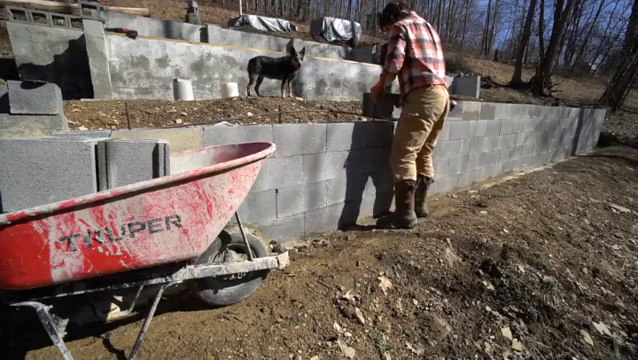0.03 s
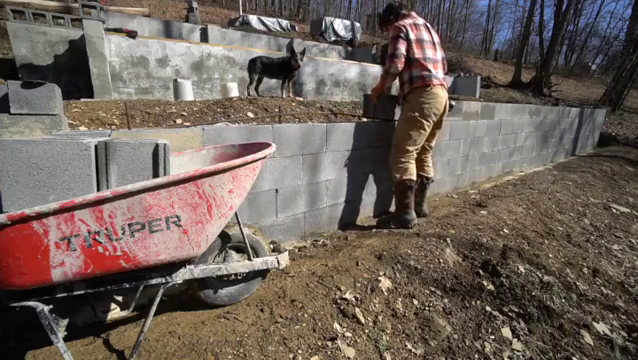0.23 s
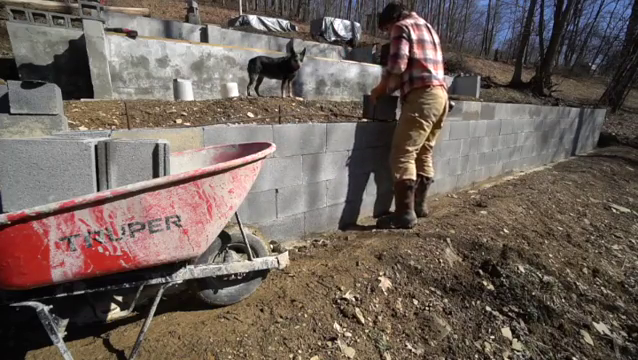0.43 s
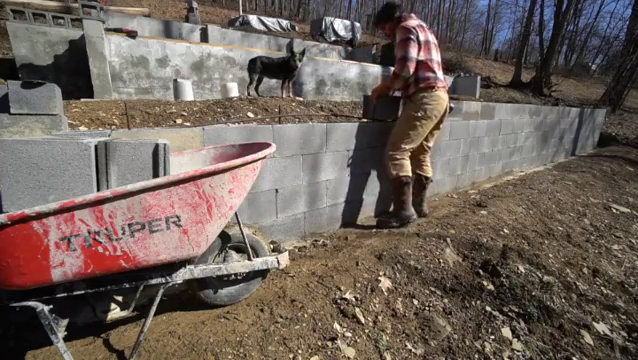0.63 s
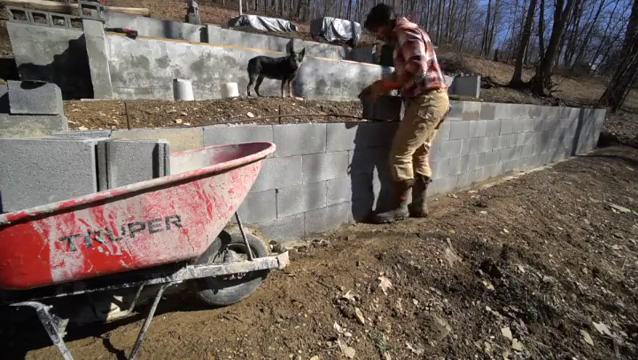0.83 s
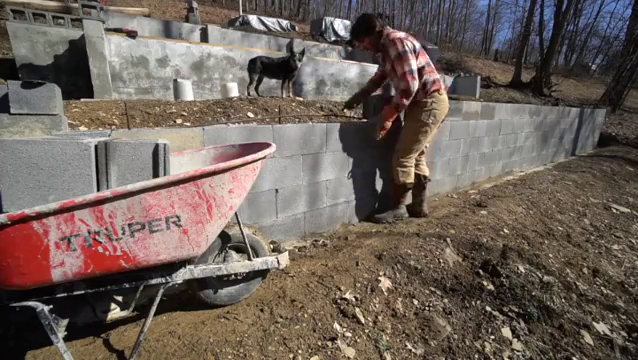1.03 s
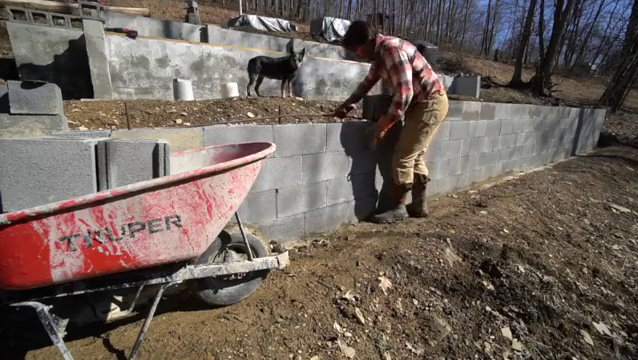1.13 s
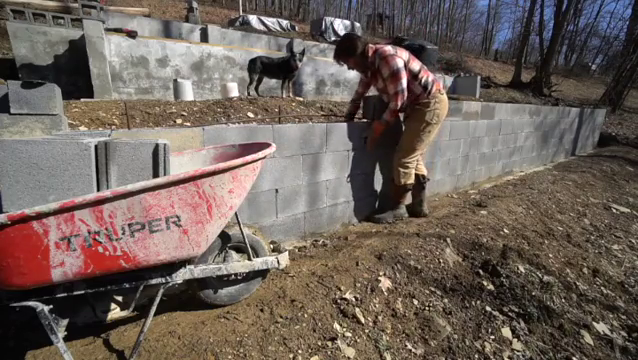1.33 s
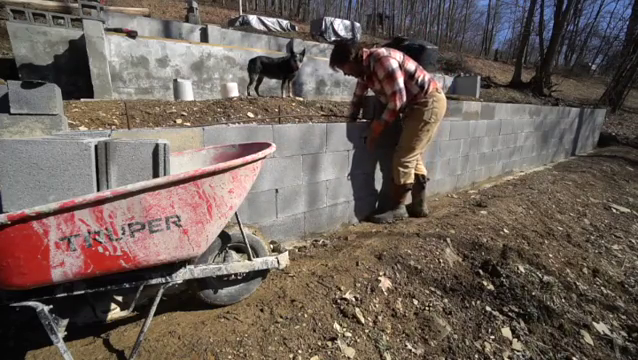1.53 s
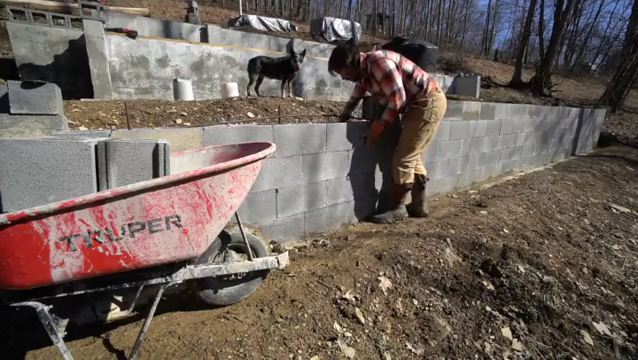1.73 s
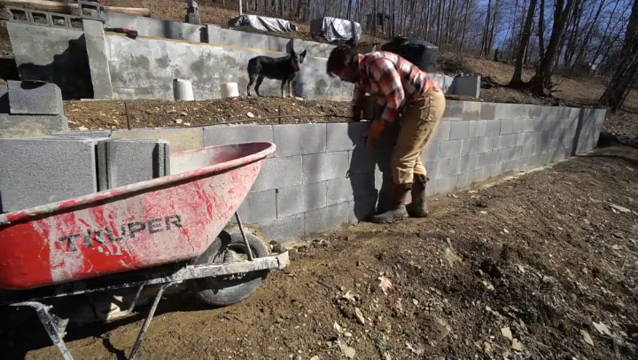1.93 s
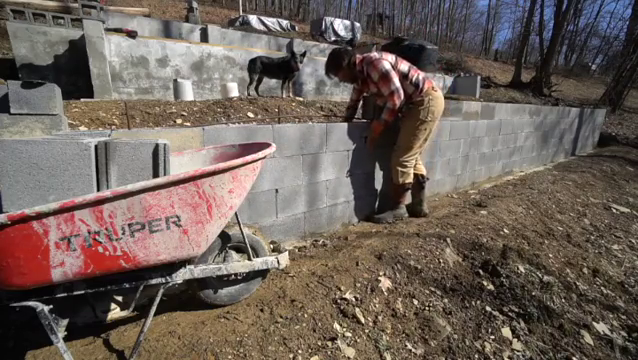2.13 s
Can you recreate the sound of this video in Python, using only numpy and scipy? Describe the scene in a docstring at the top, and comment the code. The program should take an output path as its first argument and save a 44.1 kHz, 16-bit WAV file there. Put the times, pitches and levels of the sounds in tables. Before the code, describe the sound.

In a quiet yard, a concrete block is shifted into place a few metres away with dull knocks and gritty scrapes. Soft leaf crackles and a light tap follow nearby, before two sharper clusters of knocks.

```python
"""Setting a concrete block on a garden wall

A few metres from a stereo microphone, a hollow block is shifted into place: its corners knock and rock
in quick clusters and set it ringing, and its face grinds on grit. Light taps and thin scratches ring
in between. Close by on the right, dry leaves crackle and twigs snap. The walls of the yard answer,
over a faint outdoor hush."""
import sys
import numpy as np
from scipy import signal
from scipy.fft import rfft, irfft
from scipy.io import wavfile
from scipy.ndimage import uniform_filter1d

SR = 44100
rng = np.random.default_rng(int(sys.argv[2]) if len(sys.argv) > 2 else 0)


def file_out(sig):
    """Save sig as 16-bit WAV at sys.argv[1]."""
    # one column per channel
    cols = np.atleast_2d(sig).T
    # limit, then scale
    lim = np.clip(cols, -1, 1)
    pcm = np.round(lim * 32767).astype(np.int16)
    wavfile.write(sys.argv[1], SR, pcm)


N = 97020

# Pan is left minus right throughout; levels in spectra and modes are relative.
# block contacts: t/s, level/dB, pan/dB, hardness (0 flat, 1 corner), ring/dB, bass/dB
KNOCKS = [(0.2302, -33.5, -5, 0.15, -3, -13), (0.2376, -29.5, -7, 0.35, -11, -8.5),
          (.2400, -28.5, -3, 0, -26, -2.5), (.2615, -38.5, -3, 0.2, -3, 12), (0.278, -42, 0, 0.07, -11, 19),
          (.3245, -45, -1.5, 0, -31, 8), (1.4347, -32, 15.5, 0.68, -10, 1.5),
          (1.4412, -29.5, 28, 0.16, -15.5, -1.5), (1.4464, -39.5, 2.5, 0, 11.5, -2.5),
          (1.4545, -33.5, 16, 0.49, -6, -13.5), (1.4635, -39.5, -5, 0.03, -18, -9),
          (1.4829, -45, -3, 0.84, -15, -0.5), (1.8931, -31, 41, 0.89, -19, -3.5),
          (1.8968, -31, 33, 0.93, -21, 6.5), (1.901, -38.5, 28, 0.84, -28, -6),
          (1.9140, -37.5, 8.5, 0.68, -34, 1), (1.938, -45, 12, 0.82, -19, -11),
          (1.946, -41.5, -8, 0.83, -10.5, -8.5), (1.975, -43, -19, 0.97, -21, -10)]
# spectra of a flat blow and of a hard corner blow: f/Hz, level/dB
FLAT_BLOW = [(30, -59.5), (80, -31.5), (150, -6), (400, -2.5), (720, 2), (1000, -5), (1250, -33),
             (2100, -28), (5000, -58.5), (15000, -41)]
CORNER_BLOW = [(30, -54.5), (110, -21), (380, -8.5), (560, -13), (780, 0), (1150, -3.5), (1450, 11),
               (1900, -8), (4500, -22), (7000, -38.5), (15000, -57)]
# modes of the hollow block: f/Hz, level/dB, t60/s
BLOCK_MODES = [(154, -27.5, 0.28), (291, -16, 0.11), (484, -11, 0.07), (555, -4, 0.046), (670.6, 6, 0.063),
               (742, -6, 0.044), (900, -7, 0.064), (983, 1.5, 0.055), (1574, -5, 0.041), (1699, -8.5, 0.05)]
# the block sliding: t/s, length/s, level/dB, pan/dB, grit/dB
SCRAPES = [(-.02, 0.12, -65.5, -13, -16.5), (0.125, 0.087, -55.5, -6.5, -14), (0.186, 0.14, -62, -21, 9.5),
           (0.236, 0.047, -46.5, -29, -1), (0.27, 0.061, -63, -20, 7.5), (0.31, 0.027, -59.5, -36, 10.5),
           (0.317, 0.045, -54, -4, -30), (0.427, 0.021, -54, -8.5, -35), (0.443, 0.018, -52.5, -4.5, -32),
           (0.469, 0.087, -58.5, -9.5, -8), (.503, 0.027, -53, -3, -30), (1.426, 0.039, -50.5, 16.5, 3.5),
           (1.449, 0.017, -52, 2, 7.5), (1.478, 0.062, -63.5, -4.5, 8), (1.89, 0.035, -49, 11, 5.5),
           (1.913, .014, -53.5, -1, 12), (1.925, 0.094, -62.5, 5, 5), (1.972, 0.13, -72.5, 9, -1),
           (2.077, 0.045, -70.5, -1.5, 2)]
# spectra of the sliding block and of the grit under it: f/Hz, level/dB
SLIDE_SPECTRUM = [(40, -46.5), (130, -18.5), (350, 0), (520, -0.5), (690, 5), (1000, -6.5), (1300, -19),
                  (2500, -47), (8000, -70)]
GRIT_SPECTRUM = [(200, -36), (1000, 3), (1800, 9.5), (3300, -0.5), (5000, -7), (8000, -15), (15000, -22.5)]
# light taps: t/s, level/dB, pan/dB
TAPS = [(.117, -46, -8), (0.9339, -41.5, -13), (2.174, -48.5, -7)]
# modes, one list per tap: f/Hz, level/dB, t60/s
TAP_MODES = [
    [(645, 2, 0.093), (753, -5, 0.079), (965, -5, .06)],
    [(580, -4.5, 0.02), (666, -7, 0.053), (948, -3, 0.032), (1608, -3.5, .025), (1779, 2.5, 0.044),
     (2025, -3.5, 0.022)],
    [(501, -13, 0.09), (872, -5.5, .15), (1000, 1.5, 0.34)],
]
# twigs and pebbles: t/s, level/dB, pan/dB, centre f/Hz, width/octaves, decay/s
SNAPS = [(.608, -59.5, -15, 9350, 0.16, 0.0034), (0.645, -51.5, -20, 3800, 0.73, 0.0033),
         (.696, -52.5, -13.5, 7030, 0.44, 0.00067), (0.696, -63.5, -4, 121, 0.4, 0.0015),
         (.786, -56, -32.5, 3660, 0.25, 0.023), (0.827, -58, -19, 3730, 0.21, 0.0053),
         (0.935, -45.5, -39, 6000, 0.55, 0.0066), (0.987, -59, -8, 8460, 0.46, 0.0032),
         (0.995, -56.5, 1, 8540, 0.04, 0.0039), (1.036, -65.5, -21, 8770, 0.048, 0.0018),
         (1.0974, -46.5, -17.5, 2050, 0.14, 0.0023), (1.099, -64.5, -12, 782, 0.43, 0.0019),
         (1.157, -58.5, -23, 10800, 0.3, 0.0027), (2.131, -49.5, 26, 8900, 0.15, 0.003),
         (2.131, -55, 34, 3500, 0.38, 0.0026)]
# leaves near the microphone: t/s, length/s, level/dB, pan/dB, treble slope/(dB per octave)
RUSTLES = [(0.604, 0.068, -65, -16, 13), (0.637, 0.095, -58, -26.5, 1.5), (0.668, 0.051, -55.5, -23, 0.5),
           (0.711, 0.13, -66, -15, -5.5), (0.908, 0.019, -57, -33, 0), (0.921, 0.014, -53, -9, 8.5),
           (0.936, 0.022, -50.5, -25, -3.5), (0.955, 0.07, -64, -17, 0.5), (1.021, 0.29, -76, -22, -4),
           (1.311, 0.036, -62.5, -23, -7.5), (2.135, 0.041, -66, -6, 2.5)]
# spectrum of a dry leaf: f/Hz, level/dB
LEAF_SPECTRUM = [(200, -31), (1500, -2), (2900, 6), (5000, 5), (8500, 0.5), (12000, -0.5), (15500, -25)]
# thin scratches: t/s, length/s, level/dB, pan/dB
SCRATCHES = [(0.071, 0.045, -56.5, -12.5), (2.067, 0.089, -63, -3)]
# modes, one list per scratch: f/Hz, level/dB, t60/s
SCRATCH_MODES = [
    [(2085, 3, 0.019), (3610, 3, 0.0084), (5870, 5, 0.018), (7780, -3.5, 0.024), (9780, -4, 0.012),
     (11100, -5.5, .018), (12090, -4.5, 0.017), (15000, -4.5, .008)],
    [(4550, -1.5, 0.0057), (4830, -13, 0.014), (9700, -3, 0.011), (10520, -0.5, 0.014), (12600, -14, 0.011)],
]
# echoes off the walls: delay/s, left/dB, right/dB
WALL_ECHOES = [(.0215, -24, -34), (.053, -30.5, -26), (.083, -29.5, -27), (.108, -30.5, -27.5)]
# decay of the yard's tail: f/Hz, t60/s
YARD_DECAY = [(100, 0.63), (500, 0.41), (1400, 0.71), (3700, 0.97), (10000, .24)]
# spectrum of the distant hush: f/Hz, level/dB
HUSH_SPECTRUM = [(30, -60), (263, -16.5), (560, -13), (1500, -12), (2300, -21.5), (6050, -23),
                 (15500, -27.5)]
# its rise and fall: t/s, level/dB
HUSH_LEVEL = [(0, -67.5), (.7, -66), (1.2, -70.5), (1.8, -71.5), (2.2, -62.5)]
# its balance at the microphone: f/Hz, pan/dB
HUSH_PAN = [(100, -1.5), (700, -6), (2000, -8.5), (12000, 7.5)]

FREQS_HZ = np.fft.rfftfreq(4096, 1 / SR) + 1  # grid for the spectra
HIT_GAIN = np.sqrt(SR / 100)  # a hit carries the energy of 10 ms at its level


def knocks(crush_s=0.0017, crush_db=7, bass_hz=290, corner_shift=0.06):
    """Each contact thuds or cracks and sets the hollow block ringing; light ones crumble, not click."""
    out = np.zeros((2, N))
    bass_shelf = 1 / (1 + (FREQS_HZ / bass_hz) ** 4)
    flat, corner = curve(FLAT_BLOW, FREQS_HZ), curve(CORNER_BLOW, FREQS_HZ)
    for start, db, pan_db, hardness, ring_db, bass_db in KNOCKS:
        sharpen = 1 + corner_shift * hardness ** 2  # struck on a corner, the block rings higher
        ringing = ring([(hz * sharpen, level, t60) for hz, level, t60 in BLOCK_MODES])
        graze = 2 ** ((-30 - db) / 16)  # 16 dB below a firm contact, it crumbles twice as long
        force = amp(crush_db) * graze * burst(crush_s * graze)
        force[0] += 1  # the clean click of first contact
        body = colour((1 - hardness) * flat + hardness * corner + bass_db * bass_shelf)
        place(out, start, HIT_GAIN * amp(db) * unit(signal.fftconvolve(force, body)), pan_db)
        place(out, start, HIT_GAIN * amp(db + ring_db) * ringing, pan_db / 2)
    return out


def scrapes(ring_db=-9, rise=0.21):
    """Tiny slips shake the sliding block while loose grit crunches under it."""
    out = np.zeros((2, N))
    body, ringing = colour(curve(SLIDE_SPECTRUM, FREQS_HZ)), ring(BLOCK_MODES)
    for start, length, db, pan_db, grit_db in SCRAPES:
        slips = amp(db) * grains(length, per_s=2500, spread_db=2, rise=rise)
        place(out, start, signal.fftconvolve(slips, body), pan_db)
        place(out, start, amp(ring_db) * signal.fftconvolve(slips, ringing), pan_db)
        cracks = grains(length, per_s=3500, spread_db=1, rise=rise)
        grit = crunch(cracks, curve(GRIT_SPECTRUM, FREQS_HZ), ripple_db=4.5)
        place(out, start, amp(db + grit_db) * grit, pan_db)
    return out


def taps():
    """Light taps leave a few clear resonances ringing."""
    out = np.zeros((2, N))
    for (start, db, pan_db), modes in zip(TAPS, TAP_MODES):
        place(out, start, HIT_GAIN * amp(db) * ring(modes, rise_s=0.0019), pan_db)
    return out


def snaps(skirt_db=8):
    """Twigs snap and pebbles tap, each a short burst around its own pitch."""
    out = np.zeros((2, N))
    for start, db, pan_db, hz, octaves, decay_s in SNAPS:
        off_centre = np.log2(FREQS_HZ / hz) / octaves
        body = colour(np.maximum(-skirt_db * np.hypot(1, off_centre), -70))
        snap = unit(signal.fftconvolve(burst(decay_s), body))
        place(out, start, HIT_GAIN * amp(db) * snap, pan_db)
    return out


def rustles():
    """Dry leaves crackle in short clumps, close to the microphone on the right."""
    out = np.zeros((2, N))
    for start, length, db, pan_db, slope_db in RUSTLES:
        leaf = curve(LEAF_SPECTRUM, FREQS_HZ) + slope_db * np.log2(np.maximum(FREQS_HZ, 1000))
        crackles = grains(length, per_s=2800, spread_db=3.5, rise=0.25)
        place(out, start, amp(db) * crunch(crackles, leaf, ripple_db=7.5), pan_db)
    return out


def scratches():
    """Grit rubs something thin and hard, with a brief bright ring."""
    out = np.zeros((2, N))
    for (start, length, db, pan_db), modes in zip(SCRATCHES, SCRATCH_MODES):
        rubbing = grains(length, per_s=7500, spread_db=-6, rise=0.057)
        place(out, start, amp(db) * signal.fftconvolve(rubbing, ring(modes, rise_s=0.00013)), pan_db)
    return out


def yard(sound, bleed, shared_below_hz=920, scatter_t60=0.084, build_s=0.026):
    """Wall echoes, quick scatter off ground and wall, and a faint tail; the share bleed changes sides."""
    hz, _, noise = signal.stft(rng.standard_normal((2, SR)), SR, nperseg=256)
    shared = 1 / (1 + (hz[:, None] / shared_below_hz) ** 4)  # both sides get the same bass
    noise[1] = shared * noise[0] + np.sqrt(1 - shared ** 2) * noise[1]
    frame_t = np.arange(noise.shape[-1]) * 128 / SR
    fading = noise * decay(frame_t, curve(YARD_DECAY, hz)[:, None])
    tail = signal.istft(fading, SR, nperseg=256)[1][:, :SR]
    steady = signal.istft(noise, SR, nperseg=256)[1][:, :SR]
    t = np.arange(SR) / SR
    scatter = steady[:, ::-1] * decay(t, scatter_t60)  # reversed, to be unlike the tail
    build = 1 - np.exp(-(t / build_s) ** 2)
    tail_db, scatter_db = [[-23.5], [-18]], [[-10], [-6.5]]  # left, right
    response = amp(tail_db) * unit(tail * build) + amp(scatter_db) * unit(scatter * build)
    for delay, left_db, right_db in WALL_ECHOES:
        place(response, delay, amp((left_db + right_db) / 2) * burst(decay_s=0.0017), left_db - right_db)
    crossed = sound + bleed * (sound[::-1] - sound)
    return signal.fftconvolve(crossed, response, axes=1)[:, :N]


def hush(patchy_db=2, likeness=0.37):
    """Distant air in the trees, gently uneven and partly alike on both sides."""
    hz, _, noise = signal.stft(rng.standard_normal((3, N)), SR, nperseg=1024, noverlap=768)
    patches = uniform_filter1d(rng.standard_normal(noise.shape[1:]), size=16, axis=0)
    patches = uniform_filter1d(patches, size=10, axis=1)
    level_db = curve(HUSH_SPECTRUM, hz)[:, None] + patchy_db * patches / patches.std()
    side_db = curve(HUSH_PAN, hz)[:, None] / 2
    shaped = (noise[:2] + likeness * noise[2]) * amp([level_db + side_db, level_db - side_db])
    air = signal.istft(shaped, SR, nperseg=1024, noverlap=768)[1][:, :N]
    swell = amp(np.interp(np.arange(N) / SR, *np.transpose(HUSH_LEVEL)))
    return air / air.std() * swell


def ring(modes, rise_s=0.0029):
    """Modes that swell briefly and die away, energy 1 in all."""
    t = np.arange(SR // 2) / SR
    swell = 1 - np.exp(-(t / rise_s) ** 2)
    return unit(sum(amp(db) * unit(swell * np.sin(2 * np.pi * hz * t) * decay(t, t60))
                    for hz, db, t60 in modes))


def burst(decay_s):
    """A tiny, fading cluster of clicks, energy 1."""
    t = np.arange(SR // 20) / SR
    return unit(rng.choice([-1., 1.], len(t)) * np.exp(-t / decay_s))


def grains(length, per_s, spread_db, rise):
    """Up to 0.25 s of uneven clicks, swelling for the share rise of the stroke, then fading."""
    progress = np.arange(0, 0.25, 1 / SR) / length
    fires = rng.random(len(progress)) < per_s / SR
    size = amp(spread_db * np.minimum(rng.exponential(1, len(progress)), 4))
    sign = rng.choice([-1., 1.], len(progress))
    stroke = np.clip(np.minimum(progress / rise, (1 - progress) / (1 - rise)), 0, 1)
    return unit(fires * sign * size * stroke) * np.sqrt(length * SR)


def crunch(clicks, spectrum, ripple_db, pieces=8):
    """Shares the clicks out among small pieces, each with its own uneven colour."""
    piece = rng.integers(0, pieces, len(clicks))
    ripples = rng.standard_normal((pieces, len(spectrum)))
    ripples = uniform_filter1d(uniform_filter1d(ripples, size=40), size=30)
    bodies = [colour(spectrum + ripple_db * ripple / ripple.std()) for ripple in ripples]
    return sum(signal.fftconvolve(clicks * (piece == k), body) for k, body in enumerate(bodies))


def colour(db):
    """Minimum-phase impulse response of energy 1 with the given spectrum."""
    log_gain = np.log(amp(np.concatenate([db, db[-2:0:-1]])))
    spectrum = np.exp(np.conj(signal.hilbert(log_gain)))
    return unit(np.fft.ifft(spectrum).real[:len(db)])


def place(mix, start_s, sound, pan_db):
    """Adds a mono sound to the stereo picture, at equal power for any pan."""
    at = round(start_s * SR)
    sound = sound[max(-at, 0):]
    part = mix[:, max(at, 0):][:, :len(sound)]
    gains = amp([[pan_db / 2], [-pan_db / 2]]) / np.sqrt(np.cosh(pan_db * np.log(10) / 20))
    part += gains * sound[:part.shape[1]]


def curve(points, hz):
    """Interpolates a table on a log-frequency axis."""
    table_hz, value = np.transpose(points)
    return np.interp(np.log(hz + 1), np.log(table_hz + 1), value)


def decay(t, t60):
    """Falls by 60 dB in t60 seconds."""
    return np.exp(-np.log(1000) * t / t60)


def amp(db):
    """Decibels to gain."""
    return 10 ** (np.asarray(db) / 20)


def unit(x):
    """Scales to energy 1."""
    return x / np.sqrt(np.sum(x ** 2, -1, keepdims=True) + 1e-20)


def scene():
    """What reaches the microphone: the block, the small sounds, the yard's answer and the hush."""
    blows, slides = knocks(), scrapes()
    small = rustles() + snaps() + taps() + scratches()
    reflections = yard(blows + amp(-2) * slides, bleed=0.62) + amp(-4.5) * yard(small, bleed=0.051)
    return blows + slides + small + reflections + hush()


def record(dry, low_cut_hz=36, left_dull_hz=6000, left_treble_db=-15, top_hz=15900):
    """The microphone and recorder: a wind filter, a duller left side and a band limit."""
    left, right = signal.sosfilt(signal.butter(2, low_cut_hz, "high", fs=SR, output="sos"), dry)
    treble = 1 - 1 / (1 + (np.fft.rfftfreq(N, 1 / SR) / left_dull_hz) ** 6)
    left = irfft(rfft(left) * amp(left_treble_db * treble), N)
    band_limit = signal.firwin(511, top_hz, window=("kaiser", 9), fs=SR)
    return signal.oaconvolve(np.array([left, right]), band_limit[None], "same")


dry = scene()
out = record(dry)
file_out(out)
```